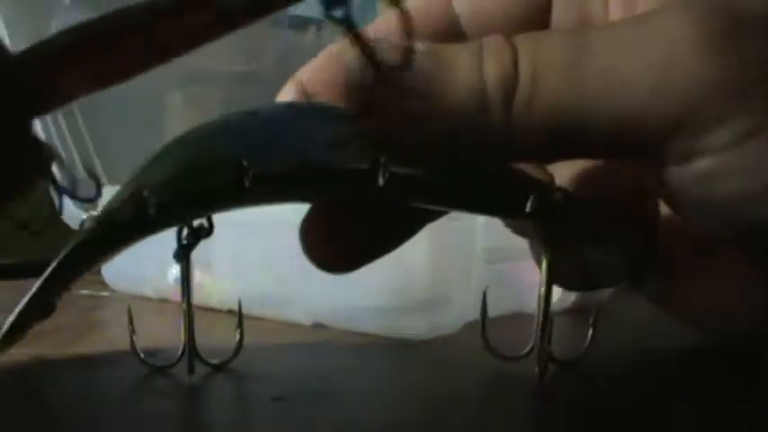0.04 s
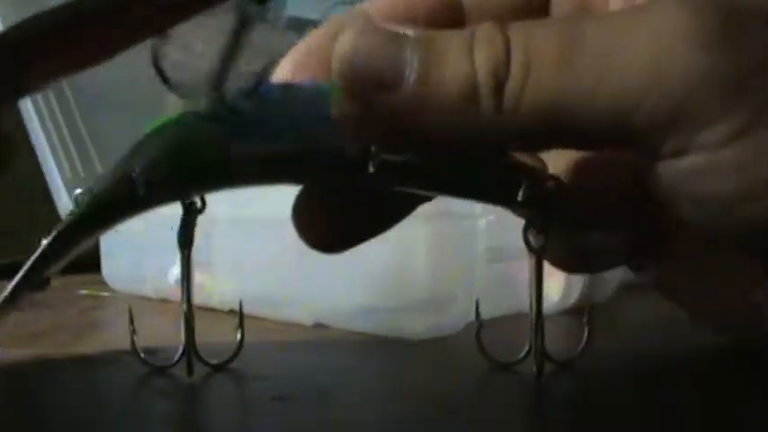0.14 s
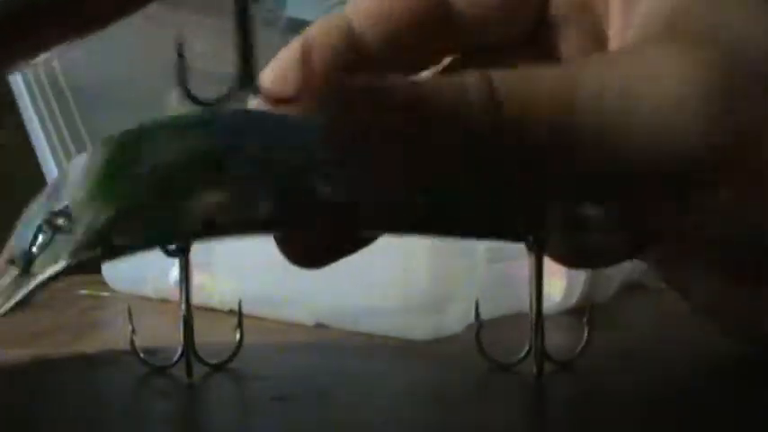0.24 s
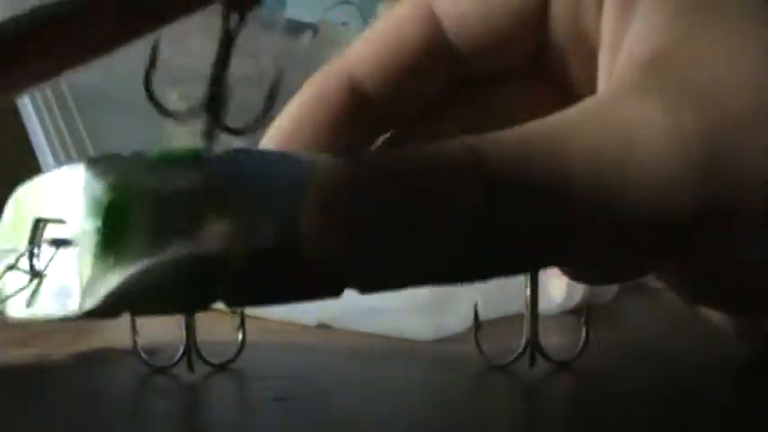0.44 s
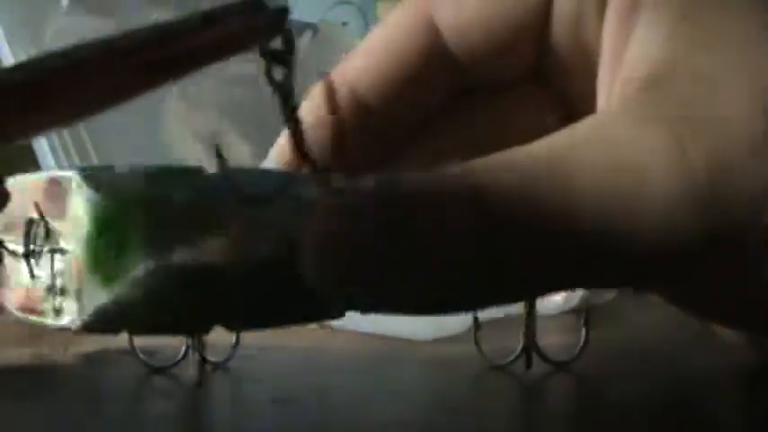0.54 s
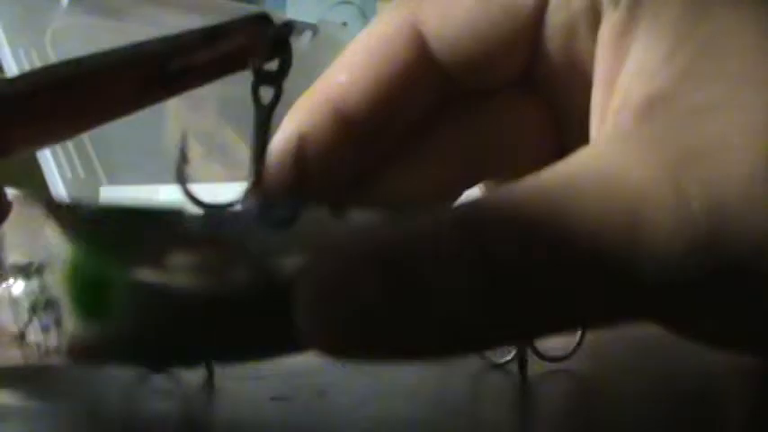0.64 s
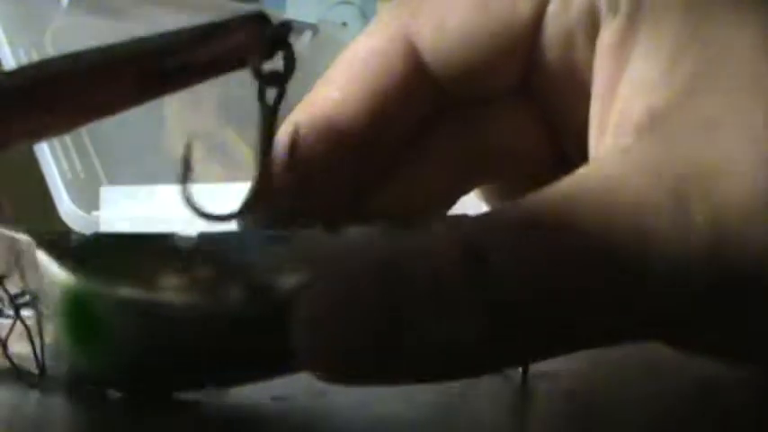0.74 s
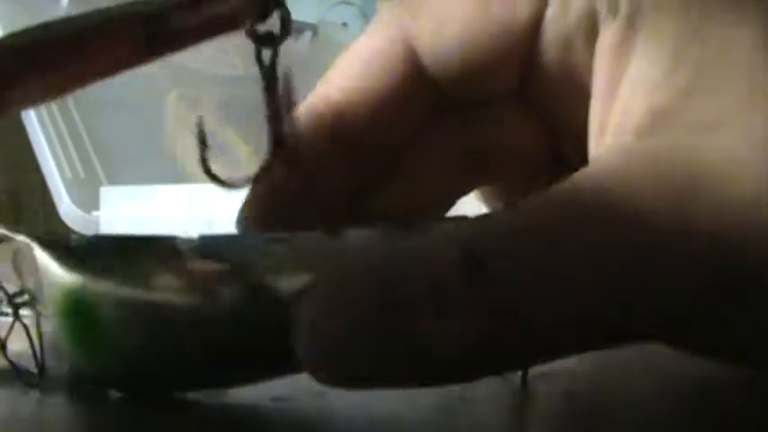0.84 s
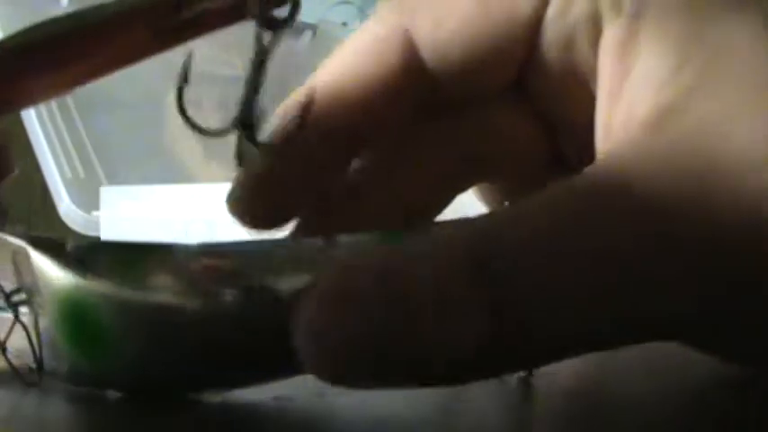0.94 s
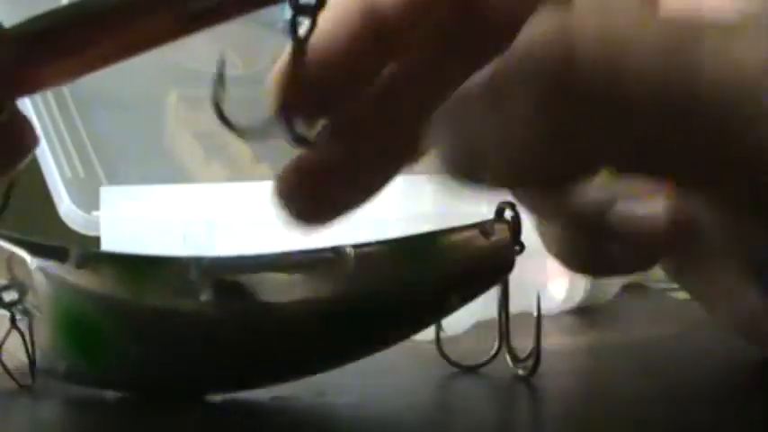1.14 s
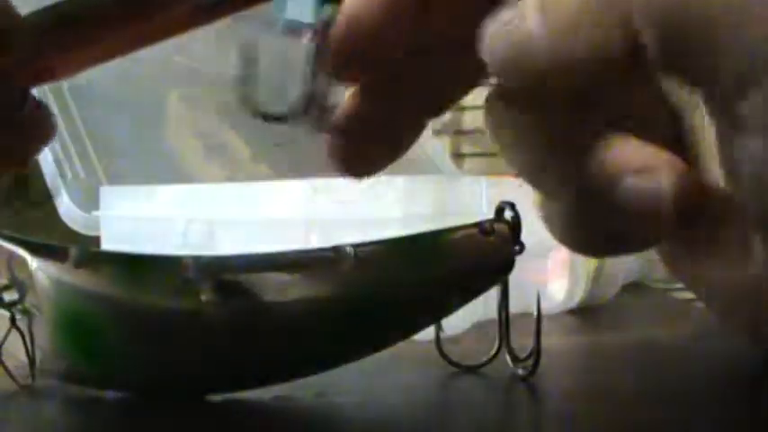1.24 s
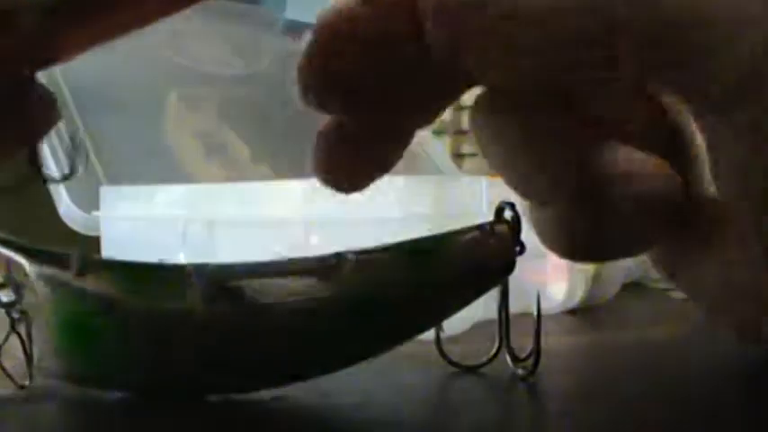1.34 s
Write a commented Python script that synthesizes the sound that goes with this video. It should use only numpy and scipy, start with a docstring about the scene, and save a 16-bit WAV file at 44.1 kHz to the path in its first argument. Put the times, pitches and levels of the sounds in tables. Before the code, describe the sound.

A fishing lure's hooks rattle brightly while it is turned over and laid down with a woody thump

```python
"""A large plastic fishing lure is turned over by hand and laid on a table, close to the microphone.
Over a faint hiss and the body's grainy rubbing, hook points skitter in trains of tiny slips, treble hooks
clink as struck metal modes, a prong sings and the hollow shell is tapped. The body lands with a woody thump
and the hooks rattle after it. A hook drags in three short stick-slip creaks, then ticks as the hand lets go."""
import sys
import numpy as np
from scipy import signal
from scipy.fft import rfft, irfft
from scipy.io import wavfile

SR = 44100
rng = np.random.default_rng(int(sys.argv[2]) if len(sys.argv) > 2 else 0)


def wav_record(signal):
    """Record a signal, one row per channel, as 16-bit PCM in the file named by sys.argv[1]."""
    frames = np.transpose(np.atleast_2d(signal))
    bounded = np.clip(frames, -1, 1)
    # unit amplitude maps onto the largest positive 16-bit level
    quanta = np.round(bounded * 32767).astype(np.int16)
    wavfile.write(sys.argv[1], SR, quanta)


N = 61739  # scene length in samples, 1.4 s

# how far the two microphones differ: side signal relative to mid
HOOK_APART, BODY_APART, TABLE_APART, FLOOR_APART = 0.3, 0.35, 0.7, 0.45


def amp(db):
    """Decibels to gain."""
    return 10 ** (np.asarray(db) / 20)


def unit(x):
    """Scales to rms 1."""
    return x / np.sqrt(np.mean(x ** 2) + 1e-20)


def struck(x):
    """Scales a blow to rms 1 over its first 4 ms."""
    return x / np.sqrt(np.mean(x[..., :176] ** 2) + 1e-20)


def read(points, hz):
    """Reads a curve of (Hz, value) points on a log-frequency axis."""
    f, value = np.transpose(points)
    return np.interp(np.log(hz + 1), np.log(f + 1), value)


def level(points):
    """A gain curve over the whole scene from (s, dB) points."""
    return amp(np.interp(np.arange(N) / SR, *np.transpose(points)))


def fade(t, t60):
    """Exponential decay, falling 60 dB in t60 seconds."""
    return np.exp(-np.log(1000) * t / t60)


def add(mix, s, sound):
    """Mixes a sound in at a time in seconds."""
    part = mix[:, max(round(s * SR), 0):][:, :sound.shape[-1]]
    part += sound[..., :part.shape[1]]


def pair(size, apart):
    """Noise for two microphones that partly differ."""
    mid, side = rng.standard_normal((2, size))
    return np.array([mid + apart * side, mid - apart * side])


def colour(x, points):
    """Causal minimum-phase filter with the given spectrum."""
    log_gain = np.log(amp(read(points, abs(np.fft.fftfreq(4096, 1 / SR)))))
    min_phase = np.exp(np.conj(signal.hilbert(log_gain)))
    impulse = np.fft.ifft(min_phase).real[:2048]
    return signal.fftconvolve(x, impulse[None], axes=1)[:, :x.shape[1]]


def ring(modes, t, apart, detune=0, spread_db=0):
    """Dying modes; grip and point of contact may shift their pitch and strength from blow to blow."""
    hz, db, t60 = np.transpose(modes)[:, :, None]
    drift, side, force = rng.standard_normal((3, len(modes), 1))
    angle = 2 * np.pi * hz * (1 + detune * drift) * t
    polarity = (-1) ** np.arange(len(modes))[:, None]
    size = amp(db + spread_db * force) * fade(t, t60) * polarity
    # opposite phase shifts set the two microphones apart
    return np.array([(size * np.sin(angle + s * apart * side)).sum(0) for s in (1, -1)])


def slips(size, per_s, spread_db, jitter, speedup=1):
    """An uneven train of stick-slip impulses, which may quicken towards its end."""
    gap, force = rng.standard_normal((size // 20, 2)).T
    rate = per_s * speedup ** (np.linspace(0, 1, size) ** 2)
    turns = np.cumsum(rate) / SR
    at = np.searchsorted(turns, np.cumsum(np.exp(jitter * gap)))
    inside = at < size
    train = np.zeros(size)
    train[at[inside]] = amp(spread_db * force)[inside]
    return train[None]


def scrape(train, shape):
    """Every slip is a click and a tiny burst of friction that ring the hook."""
    slip_t60, grit_db = 0.008, -3
    burst = fade(np.arange(1000) / SR, slip_t60)
    burst = burst / np.linalg.norm(burst)
    friction = signal.fftconvolve(train, burst[None], axes=1)[:, :train.size]
    grit = friction * pair(train.size, HOOK_APART)
    return unit(colour(train + amp(grit_db) * grit, shape))


def background():
    """Faint steady hiss: noise given a fixed spectrum."""
    # background spectrum: pitch_hz [Hz], level_db [dB]
    hiss_shape = [(15, -23), (25, 9), (229, -5.5), (354, -8.5), (463, -2.5), (1260, -7.5), (1700, -6.5),
                  (2080, -1.5), (2600, -6), (16000, -14)]
    hiss_db = -59.5
    return amp(hiss_db) * unit(colour(pair(N, FLOOR_APART), hiss_shape))


def skitter():
    """Hook points hop at a nearly steady rate while their rings rattle finely; light touches are duller."""
    # hook points pressing on the table: time_s [s], level_db [dB]
    pressure = [(0, -65), (.06, -68), (.11, -45), (.2, -48), (.24, -37), (.27, -47), (.31, -45.5),
                (.35, -36), (.39, -42.5), (.45, -47), (.48, -43.5), (.51, -46.5), (.57, -39), (.62, -51),
                (.71, -46), (.765, -32.5), (.8, -53.5), (.88, -69), (1.03, -64), (1.11, -52), (1.15, -62),
                (1.28, -87), (1.34, -62), (1.4, -74)]
    # tone of the skittering hook: pitch_hz [Hz], level_db [dB]
    skitter_shape = [(800, -20), (2000, -17), (2700, -10), (3400, -9), (4100, -12), (4650, -3), (5400, -12),
                     (6400, -10), (7400, -3), (8400, 0), (8900, -2), (9400, 2.5), (10200, 2), (10700, -2),
                     (11500, -1), (12800, -12), (15500, -20)]
    hops_per_s, rattles_per_s = 215, 700  # from the median gap
    spread_db, rattle_db = 2.5, -3
    bright_db, dull_hz = -38, 10800  # full brightness from this level up; cutoff of the dull version

    hops = scrape(slips(N, hops_per_s, spread_db, jitter=0.13), skitter_shape)
    rattle = scrape(slips(N, rattles_per_s, spread_db, jitter=0.54), skitter_shape)
    bright = unit(hops + amp(rattle_db) * rattle)
    dull = signal.sosfiltfilt(signal.butter(4, dull_hz, fs=SR, output="sos"), bright)
    force = level(pressure)
    brightness = np.minimum(force / amp(bright_db), 1)
    return force * (dull + brightness * (bright - dull))


def rub():
    """Low grainy friction of the hollow body on fingers and table: sparse noise grains, coloured."""
    # rubbing strength: time_s [s], level_db [dB]
    strength = [(0, -63.5), (.14, -57), (.2, -58), (.28, -50), (.33, -57), (.39, -52), (.46, -46),
                (.48, -57.5), (.52, -41), (.57, -47), (.61, -53), (.64, -38.5), (.69, -34), (.72, -45.5),
                (.85, -54), (.98, -64.5), (1.05, -54.5), (1.17, -61), (1.27, -74.5), (1.4, -56.5)]
    # tone of the rubbing body: pitch_hz [Hz], level_db [dB]
    rub_shape = [(25, -24), (80, -10), (120, -10), (165, 1), (290, 2), (390, -13), (700, -18), (1050, -34),
                 (2000, -33), (4000, -48), (9000, -97)]
    grains_per_s = 3000
    grains = pair(N, BODY_APART) * (rng.random(N) < grains_per_s / SR)
    return level(strength) * unit(colour(grains, rub_shape))


def metal(t):
    """One touch of steel: a sharp contact and the hook's modes."""
    # nominal hook modes: pitch_hz [Hz], level_db [dB], t60_s [s]
    hook_modes = [(2680, -6.5, 0.037), (3290, -18, 0.025), (3770, -12.5, 0.039), (4626, 5, 0.025),
                  (6380, -5.5, 0.038), (6700, -15, 0.0045), (8400, -2, 0.023), (9330, -7.5, 0.017),
                  (10100, -8, 0.013), (10840, 7.5, 0.014), (11740, 9.5, 0.012), (13800, -9, .02)]
    # tone of the contact noise: pitch_hz [Hz], level_db [dB]
    contact_shape = [(300, -40), (1200, -7.5), (2100, -6.5), (2600, -0.5), (5000, 4.5), (8000, 0.5),
                     (11000, 4), (13500, -7), (16000, -23.5)]
    contact_db, contact_t60 = -0.5, 0.008
    contact = struck(colour(pair(len(t), HOOK_APART) * fade(t, contact_t60), contact_shape))
    modes = struck(ring(hook_modes, t, HOOK_APART, detune=0.018, spread_db=4))
    return amp(contact_db) * contact + modes


def clinks():
    """Each clink favours one ring, rebounds once and has its own share of low ring and sizzle."""
    # hook clinks, levels before the trims below: start_s [s], level_db [dB],
    # low_ring_db [dB], top_sizzle_db [dB], strongest_ring_hz [Hz]
    clink_list = [(0.06, -47, 1, -20, 8500), (0.0665, -36.5, -1, -11, 6400), (0.0703, -25, -10, -8, 2710),
                  (0.0762, -32.5, -3.5, -7, 2590), (0.099, -24, -9, -17, 11300),
                  (0.1134, -23.5, -10.5, -29, 11000), (0.1156, -29.5, -8, -8, 9200),
                  (0.1295, -28, -8.5, -13, 9800), (0.1374, -32.5, -5, -18, 9200),
                  (0.148, -32.5, -7, -23, 9300), (0.154, -34, -7, -10, 9300), (0.1638, -35, -7, -13, 7900),
                  (0.1747, -43.5, 3.5, -12, 9300), (0.1827, -33, -7.5, -10, 8950),
                  (0.2058, -29, -12.5, -9, 9600), (0.2182, -13, -10, -15, 6290),
                  (0.2263, -16.5, -27, -9, 8400), (0.2365, -36, -25, -8, 9340),
                  (0.2468, -24, -17, -15, 8170), (0.2487, -24.5, -15, -2.5, 12300),
                  (0.271, -25.5, -7, -10, 8840), (0.285, -24, -11.5, -15, 9900),
                  (0.2873, -45.5, 8.5, -33, 2530), (0.3035, -20, -17, -38, 9660),
                  (0.3203, -38.5, 6, -12, 4600), (0.335, -11, -16.5, -6.5, 11340),
                  (0.34, -26.5, -6, 0, 9700), (0.3476, -28, -16, -6, 10400), (0.353, -25, -16, -20, 10500),
                  (0.3644, -19, -17, -10, 10100), (0.3737, -22.5, -2.5, -2.5, 4760),
                  (0.3897, -16, -15, -6, 9330), (0.4006, -27.5, -16, -5, 6400),
                  (0.4127, -26.5, -17, -34, 11200), (0.4217, -36, -25, -11, 11100),
                  (0.4324, -35, -18, -22, 9600), (0.437, -31.5, -18, -7, 9330),
                  (0.4425, -41, -16, -16, 10200), (0.4575, -41, -18, -12, 10000),
                  (0.4868, -20, -13, -7.5, 10000), (0.496, -31, -24, -24, 9000),
                  (0.5026, -30, -7.5, -24, 9100), (0.5167, -22.5, -15, -31, 9550),
                  (0.5211, -23.5, -13, -11, 10440), (0.5265, -22.5, -18, -27, 8100),
                  (0.5397, -25.5, -10, -22, 9600), (0.5431, -17.5, -9.5, -8.5, 9360),
                  (0.5518, -32, -25, -24, 8000), (0.565, -38, -5, -28, 8900),
                  (0.5779, -27.5, -7.5, -19, 8500), (0.6013, -19, -9, -9.5, 9980),
                  (0.6038, -27, -8, -27, 10100), (0.6875, -28.5, -2, -14, 4560),
                  (0.73, -25.5, -9.5, -24, 8000), (0.7388, -29.5, -2, -21, 8400),
                  (0.747, -10.5, -14, -6, 11620), (0.7532, -15, -11, -6.5, 8900),
                  (0.7559, -19.5, -8.5, -20, 6340), (0.7616, -24.5, -2, -3.5, 11700),
                  (0.7738, -16.5, -8.5, -12.5, 4920), (0.7776, -28, -24, 2, 11800),
                  (1.0958, -35.5, -6, -13, 7560), (1.1182, -42, -1, 3, 6330), (1.124, -38, -3.5, -6, 11900),
                  (1.2074, -45, -7, -13, 7900)]
    clink_trim_db, low_trim_db, top_trim_db = -9, 2.5, 7
    own_ring_db, own_ring_cycles = -1, 100  # cycles until 60 dB down
    rebound_db = -15
    low_edge_hz, top_edge_hz = 5500, 11500

    out, t = np.zeros((2, N)), np.arange(4096) / SR
    low_band = signal.butter(6, low_edge_hz, "low", fs=SR, output="sos")
    mid_band = signal.butter(6, [low_edge_hz, top_edge_hz], "band", fs=SR, output="sos")
    top_band = signal.butter(6, top_edge_hz, "high", fs=SR, output="sos")
    for s, db, low_db, top_db, ring_hz in clink_list:
        own_ring = struck(ring([(ring_hz, 0, own_ring_cycles / ring_hz)], t, HOOK_APART))
        touch = metal(t) + amp(own_ring_db) * own_ring
        rebound_s = rng.uniform(0.000269, 0.00832)
        add(touch, rebound_s, amp(rebound_db) * metal(t))
        low = amp(low_db + low_trim_db) * struck(signal.sosfilt(low_band, touch))
        mid = struck(signal.sosfilt(mid_band, touch))
        top = amp(top_db + top_trim_db) * struck(signal.sosfilt(top_band, touch))
        pan_db = rng.uniform(-1.5, 1.5)
        add(out, s, amp(db + clink_trim_db) * amp([[pan_db], [-pan_db]]) * (low + mid + top))
    return out


def flicks():
    """A prong flicked by a fingertip sings its lowest note almost purely: one softly starting mode."""
    # flicks of a prong: start_s [s], level_db [dB], pitch_hz [Hz]
    flick_list = [(0.0675, -41.5, 2625), (1.078, -53, 2830), (1.084, -48, 2680), (1.097, -47, 2670),
                  (1.107, -52, 2680), (1.1188, -41.5, 2680), (1.134, -51, 2700)]
    rise_s, flick_t60 = 0.0008, 0.022
    out, t = np.zeros((2, N)), np.arange(4000) / SR
    for s, db, hz in flick_list:
        note = ring([(hz, 0, flick_t60)], t, HOOK_APART)
        add(out, s, amp(db) * struck(note * np.minimum(t / rise_s, 1)))
    return out


def snap(t, t60, grit_db, apart):
    """A sharp click trailed by a burst of grit."""
    grit = pair(len(t), apart) * fade(t, t60)
    return (t == 0) + amp(grit_db) * grit / np.linalg.norm(grit[0])


def taps():
    """Hooks tap the hollow plastic body: short dry knocks on the shell ring its cavity."""
    # taps: start_s [s], level_db [dB], cavity_ring_db [dB against the knock]
    tap_list = [(0.219, -38.5, -8.5), (0.3231, -37.5, -1.5), (.3315, -47, 4.5), (0.372, -43, -2.5),
                (0.5433, -43, -8), (.602, -44.5, -28), (0.7468, -30.5, -8), (.756, -22.5, -14),
                (1.118, -33.5, -17.5), (1.165, -55, -24)]
    # tone of the plastic shell: pitch_hz [Hz], level_db [dB]
    shell_shape = [(200, -23), (700, -14), (1100, -9.5), (1500, 0), (1900, -1), (2200, 0), (2700, 7.5),
                   (3200, -0.5), (4100, -6.5), (4800, -1.5), (6400, -0.5), (7500, -16), (14000, -55)]
    # hollow body modes: pitch_hz [Hz], level_db [dB], t60_s [s]
    cavity_modes = [(604, 8, 0.031), (815, 8, 0.041), (1155, -4, 0.089), (1780, -23, 0.019),
                    (2140, 8.5, 0.043)]
    out, t = np.zeros((2, N)), np.arange(4000) / SR
    for s, db, cavity_db in tap_list:
        click = snap(t, t60=0.02, grit_db=-2, apart=BODY_APART)
        knock = struck(colour(click, shell_shape))
        cavity = struck(ring(cavity_modes, t, BODY_APART))
        add(out, s, amp(db) * (knock + amp(cavity_db) * cavity))
    return out


def thumps():
    """The body's push and crack set the tabletop ringing into a dense woody boom, dulled landing by landing."""
    # landings, levels before the closing colour:
    # start_s [s], level_db [dB], push_pitch_hz [Hz], dull_above_hz [Hz]
    thump_list = [(0.2212, -28, 214, 280), (0.4034, -34.5, 148, 550), (0.443, -55, 315, 590),
                  (0.675, -33, 224, 450), (0.7158, -14, 282, 1150), (0.7273, -18.5, 177, 650),
                  (.755, -26.5, 380, 900), (1.117, -49, 194, 348), (1.375, -49.5, 627, 1420)]
    # table modes: pitch_hz [Hz], level_db [dB], t60_s [s]
    table_modes = [(78.5, -9.5, 0.26), (158.5, -4, 0.11), (254, -8, 0.15), (323, -24, 0.064),
                   (427.6, -1.5, 0.084), (503, -10, 0.19), (559.6, -9, 0.22), (643, -2.5, 0.16),
                   (724, -1.5, 0.27), (900.5, -8, 0.19)]
    # tones of the crack, thud and boom noises: pitch_hz [Hz], level_db [dB]
    crack_shape = [(300, -6.5), (900, 0.5), (1150, -3), (1450, 1.5), (1900, -8), (2600, -3), (3100, -23),
                   (8000, -28)]
    thud_shape = [(25, -0.5), (70, -11), (150, 3), (400, 3.5), (850, 3.5), (1100, -6.5), (2200, -23),
                  (3200, -20.5)]
    boom_shape = [(30, -3), (80, -3.5), (150, -9), (250, 0), (420, -1.5), (720, 2), (930, -2),
                  (1100, -10.5), (1500, -14), (3000, -34.5)]
    push_db, push_t60 = 15.5, 0.023
    # shape, level dB, t60 s
    layers = [(crack_shape, -1.5, 0.034), (thud_shape, 7.5, 0.062), (boom_shape, -2.5, 0.33)]

    out, t = np.zeros((2, N)), np.arange(SR // 2) / SR
    for s, db, push_hz, dull_hz in thump_list:
        push = amp(push_db) * -np.sin(2 * np.pi * push_hz * t) * fade(t, push_t60)
        wood = sum(amp(part_db) * unit(colour(pair(len(t), BODY_APART), shape)) * fade(t, t60)
                   for shape, part_db, t60 in layers)
        blow = push + wood + ring(table_modes, t, TABLE_APART)
        blow = signal.sosfilt(signal.butter(2, dull_hz, fs=SR, output="sos"), blow)
        # level set over the first 20 ms
        add(out, s, amp(db) * blow / np.std(blow[:, :SR // 50]))
    return colour(out, [(20, -15), (60, -6.0), (120, -10.5), (160, 0), (1000, -7), (2000, 4.0)])


def creaks():
    """A dragged hook's regular slips swell, then quicken and dull into a smooth scrape as the pressure eases."""
    # creaks: start_s [s], length_s [s], level_db [dB], first_slip_rate [slips per s]
    creak_list = [(0.845, 0.061, -48.5, 217), (0.913, 0.056, -46.5, 225), (0.986, 0.025, -46.5, 260)]
    # tone of the creaking hook: pitch_hz [Hz], level_db [dB]
    creak_shape = [(1000, -22), (2200, -6.5), (2950, 6.5), (3900, -2.5), (4680, 5), (5600, -4.5), (6480, 2),
                   (7100, -3), (7900, 6.5), (8350, -1), (8850, 14.5), (9800, -2.5), (10400, 7), (11300, -3),
                   (12500, -14), (15000, -30)]
    speedup, dull_hz = 1.9, 6000  # last slip rate over first; cutoff of the dull version
    swell_power = 0.8  # below 1 the swell peaks before the middle
    out = np.zeros((2, N))
    for s, length, db, per_s in creak_list:
        along = np.linspace(0, 1, int(length * SR))
        train = slips(along.size, per_s, spread_db=1.5, jitter=0.027, speedup=speedup)
        creak = scrape(train * np.sin(np.pi * along ** swell_power), creak_shape)
        dull = signal.sosfiltfilt(signal.butter(2, dull_hz, fs=SR, output="sos"), creak)
        add(out, s, amp(db) * (creak + along ** 2 * (dull - creak)))
    return out


def room(x, t60s):
    """Scattered reflections: noise tails after a 2.5 ms gap, each band dying at its own speed."""
    hz, t, z = signal.stft(rng.standard_normal((2, SR // 2)), SR, nperseg=128)
    decay = fade(t, read(t60s, hz)[:, None])
    tail = signal.istft(z * decay, SR, nperseg=128)[1]
    tail[:, :SR // 400] = 0
    return signal.fftconvolve(x, tail / np.linalg.norm(tail[0]), axes=1)[:, :N]


def scene():
    """Hooks and body, reflections from table and room, and a faint background hiss."""
    # room decay: pitch_hz [Hz], t60_s [s]
    room_t60 = [(100, 0.075), (500, 0.33), (3000, 0.27), (8000, 0.17), (15000, 0.021)]
    near_t60, near_db = 0.02, -11  # table reflections of the hooks
    hook_room_db, body_room_db = -13.5, -18

    hooks = skitter() + clinks() + flicks() + taps() + creaks()
    body = rub() + thumps()
    near = amp(near_db) * room(hooks, [(1000, near_t60)])
    far = room(amp(hook_room_db) * hooks + amp(body_room_db) * body, room_t60)
    return hooks + body + near + far + background()


def record(dry):
    """The microphone pair's width and lean to the left, then the recorder's band limit."""
    # gain of the left-right difference: pitch_hz [Hz], gain_db [dB]
    width = [(30, 6), (70, 1), (150, -1), (300, 2), (600, 1), (1000, 8), (2400, -5), (4500, 4), (8000, 1),
             (13000, -5)]
    left_db, cutoff_hz = 0.23, 15900  # left is raised and right lowered by left_db
    mid = dry.mean(0)
    side_gain = amp(read(width, np.fft.rfftfreq(N, 1 / SR)))
    side = irfft(rfft(dry[0] - mid) * side_gain, N)
    both = np.array([mid + side, mid - side]) * amp([[left_db], [-left_db]])
    low_pass = signal.firwin(255, cutoff_hz, window=("kaiser", 9), fs=SR)
    return signal.oaconvolve(both, low_pass[None], "same")


dry = scene()
out = record(dry)
wav_record(out)
```